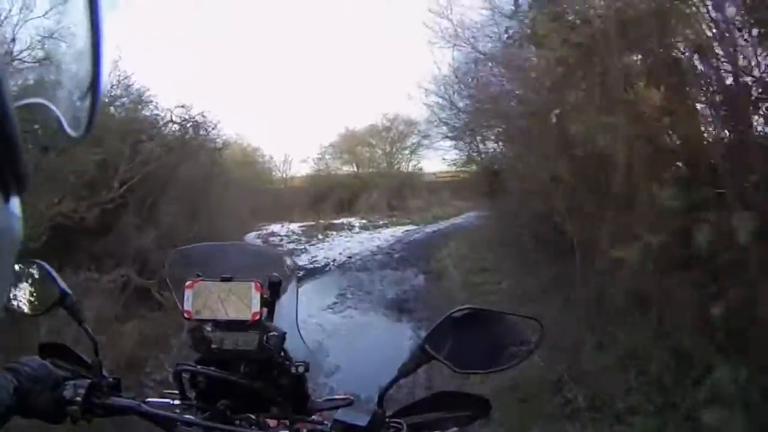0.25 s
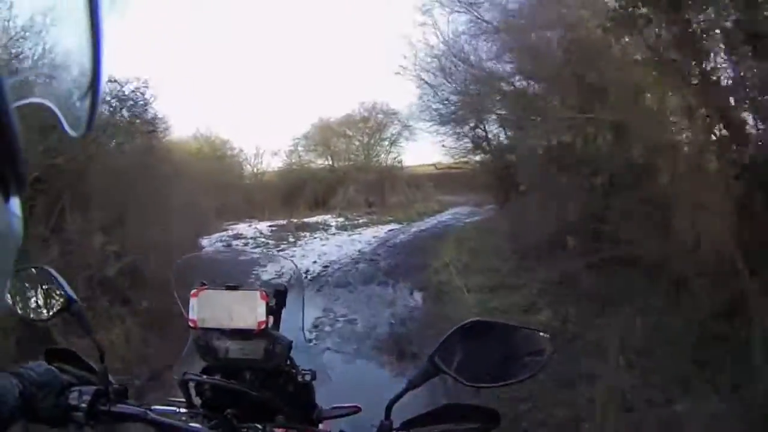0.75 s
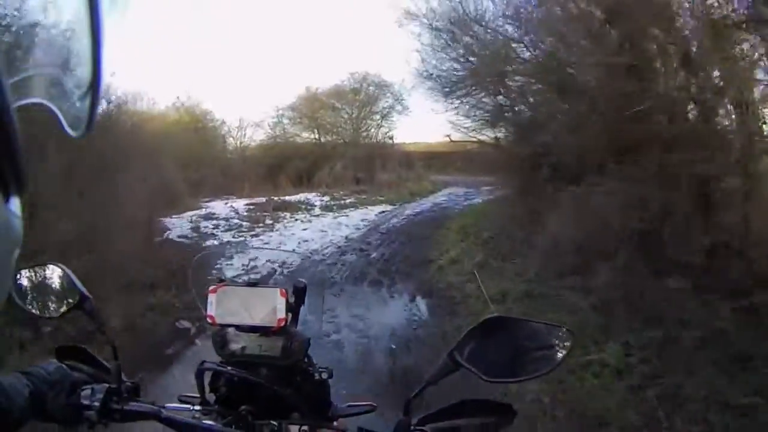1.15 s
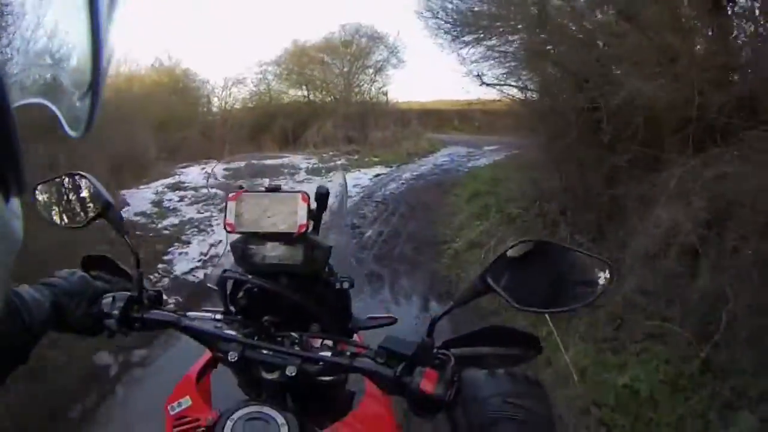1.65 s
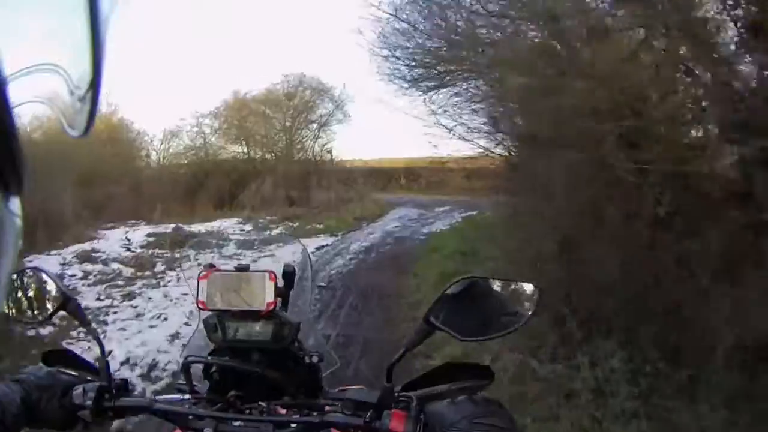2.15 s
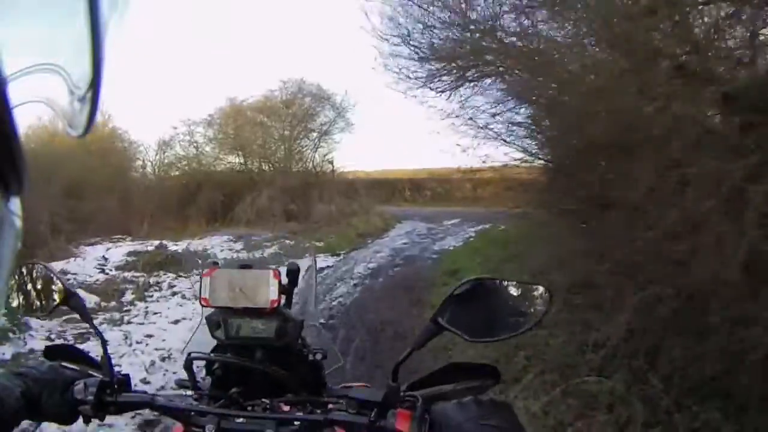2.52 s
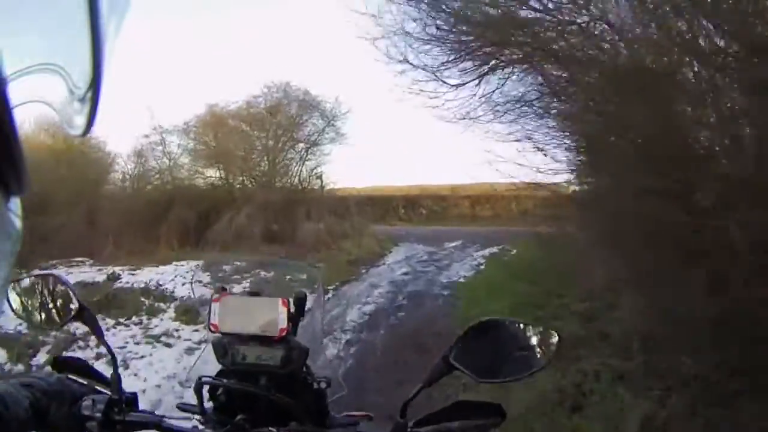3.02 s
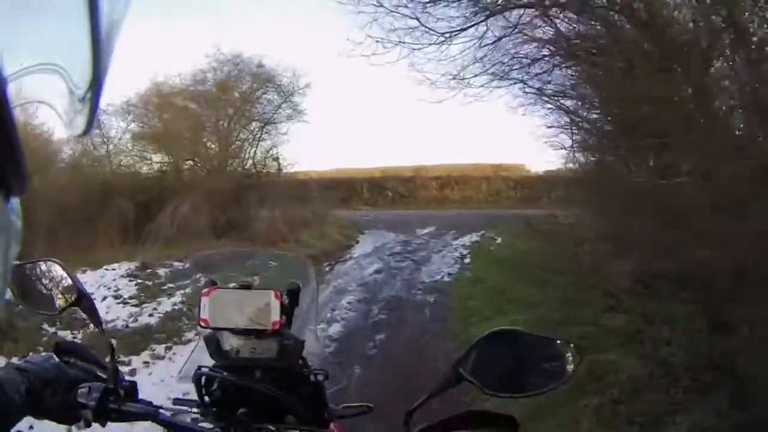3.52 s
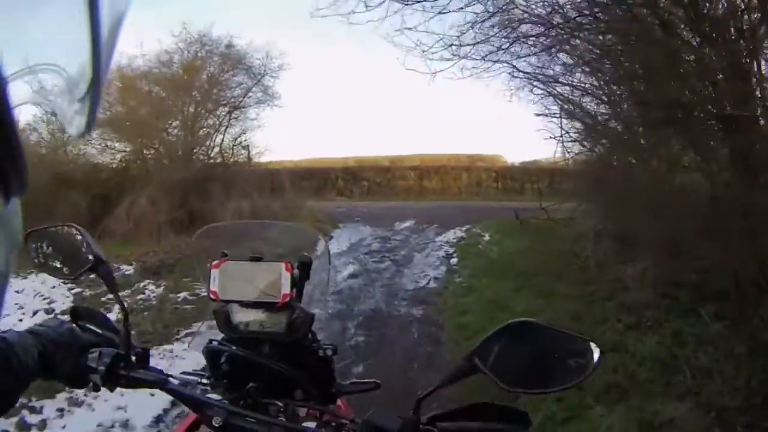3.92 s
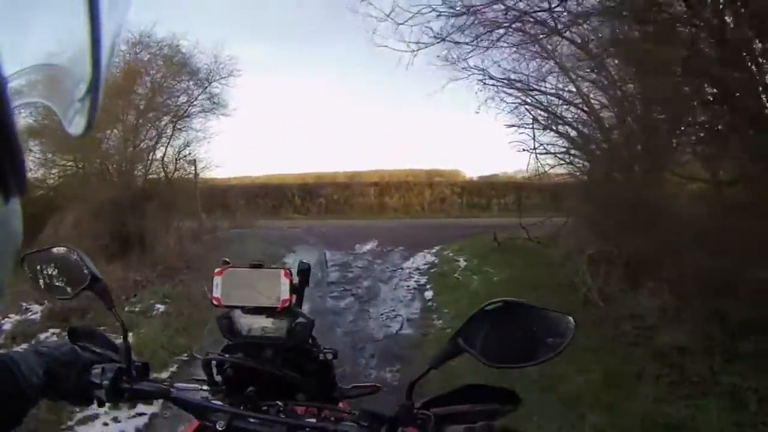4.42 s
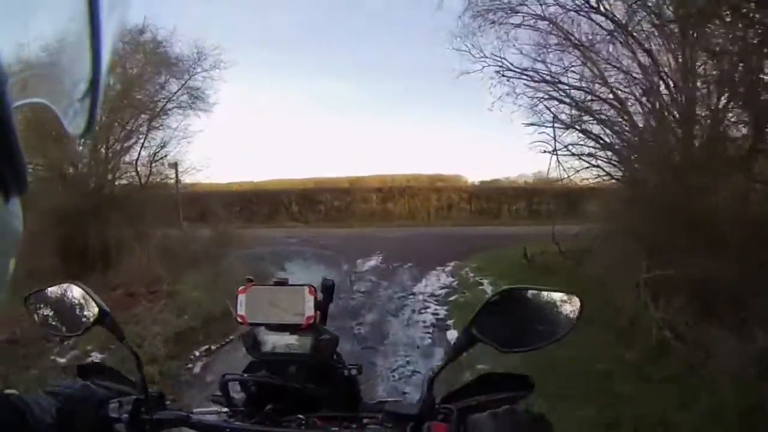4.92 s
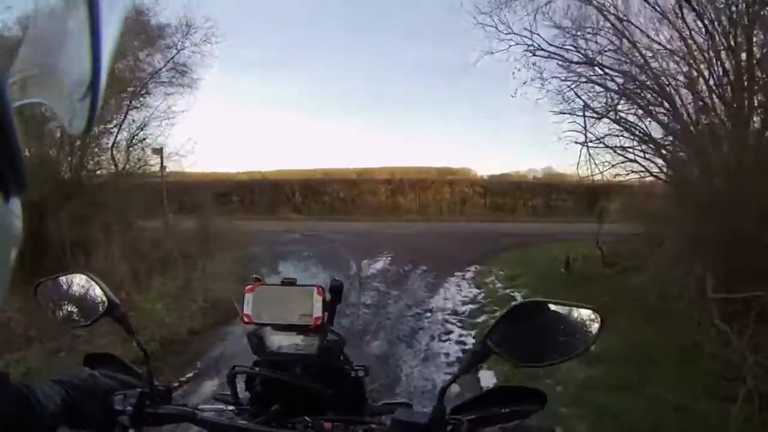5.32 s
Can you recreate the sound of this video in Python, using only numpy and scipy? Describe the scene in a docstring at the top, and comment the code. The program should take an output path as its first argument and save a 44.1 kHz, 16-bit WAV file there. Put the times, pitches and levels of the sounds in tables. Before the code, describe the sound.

Helmet-mounted view of a small motorbike easing off, pulling forward twice and slowing, amid wet spray, low gust thumps and mount rattles.

```python
"""Trail motorcycle on a slushy track

A single-cylinder engine opens up and shuts down, heard from a microphone in a camera on the rider's helmet.
Each firing excites exhaust resonances and each gulp of air the airbox; sine tones make throb, drone and gears.
Shaped noise makes valve sizzle, tyre spray and wind; gust blows are drawn as pairs of opposite swings.
Knocks ring the mount and bumps swell a helmet hum, over faint circuit tones and a steady rush.
The camera housing then colours the treble."""
import sys
import numpy as np
from scipy import signal
from scipy.fft import rfft, irfft
from scipy.io import wavfile
from scipy.ndimage import uniform_filter1d

SR = 44100
rng = np.random.default_rng(int(sys.argv[2]) if len(sys.argv) > 2 else 0)


def materialize(psi):
    """Save the field psi as 16-bit PCM at rate SR to the path in sys.argv[1].

    A 1-D psi becomes a single channel; in a 2-D psi each row is a channel.
    """
    bounded = np.clip(np.atleast_2d(psi).T, -1, 1)
    quanta = np.round(bounded * 32767).astype(np.int16)
    wavfile.write(sys.argv[1], SR, quanta)


N = 245195  # length in samples


def undb(db):
    """Decibels to gain."""
    return 10 ** (np.asarray(db) / 20)


def unit(x):
    """Scale to rms 1."""
    return x / np.sqrt(np.mean(x ** 2))


def noise():
    """Flat random noise, one value per sample."""
    return rng.standard_normal(N)


def curves(table):
    """Columns of a time table, one value per sample."""
    s, *columns = np.transpose(table)
    return [np.interp(np.arange(N) / SR, s, column) for column in columns]


def band(x, hz, width):
    """Two-pole resonance, gain 1 at the centre."""
    return signal.lfilter(*signal.iirpeak(hz, hz / width, SR), x)


def colour(x, shape):
    """Give a flat sound a spectrum of (Hz, relative dB) points, at rms 1."""
    hz, db = np.transpose(shape)
    f = np.arange(N // 2 + 1) * SR / N + 1  # the extra 1 Hz avoids log(0)
    gain = undb(np.interp(np.log(f), np.log(hz), db, left=-80))
    return unit(irfft(rfft(x) * gain, N))


def walk(rate):
    """Random levels held 1 / rate s, then smoothed twice; rms 1."""
    k = int(SR / rate)
    steps = np.repeat(rng.standard_normal(N // k + 1), k)
    return unit(uniform_filter1d(uniform_filter1d(steps, k), k)[:N])


def grains(rate, spread_db):
    """Lone clicks at random moments (rate per second), a few much larger than the rest."""
    return (rng.random(N) < rate / SR) * noise() * undb(spread_db * rng.exponential(size=N))


def add(out, s, x):
    """Mix x into out from time s."""
    i = max(int(s * SR), 0)
    out[i:i + len(x)] += x[:N - i]


def ring(modes):
    """Struck modes: a sum of sines, each dying away exponentially."""
    t = np.arange(SR // 8) / SR
    return sum(undb(db) * np.sin(2 * np.pi * hz * t) * undb(-60 * t / t60) for hz, db, t60 in modes)


# Thin electronic tones. Each row: pitch in Hz, width in Hz, level in dB.
CIRCUIT_TONES = [(3850, 150, -71), (6530, 30, -74), (9543, 14, -77), (12724, 12, -86)]
# Spectrum of the steady rush. Each row: frequency in Hz, relative level in dB per Hz.
RUSH_SHAPE = [(410, -5), (700, -4), (981, -2.5), (1260, -3), (2350, -3.5), (2600, -0.5), (3870, -15),
              (4500, -11), (6300, -6.5), (8500, -9), (9280, -3.5), (11300, -23), (13800, -10)]
RUSH_DB = -61


def circuit():
    """Faint wavering tones, made of narrow-band noise, over a steady rush that never stops."""
    tones = sum(undb(db) * unit(band(noise(), hz, width)) for hz, width, db in CIRCUIT_TONES)
    return tones + undb(RUSH_DB + 0.56 * walk(7.2)) * colour(noise(), RUSH_SHAPE)


# Level of the deep wind. Each row: time in seconds, level in dB.
DEEP_WIND = [(0, -40.5), (.5, -51), (.7, -46), (1.3, -41.5), (1.55, -53), (1.9, -43), (2.6, -50),
             (2.8, -33), (3.0, -44.5), (3.35, -43), (3.7, -44.5), (4.0, -40), (4.3, -38), (4.6, -47),
             (5.2, -44.5), (5.56, -47)]
# Spectrum of the flutter. Each row: frequency in Hz, relative level in dB per Hz.
FLUTTER_SHAPE = [(30, -8), (50, -8), (75, -8), (120, -12), (200, -17), (270, -15), (340, -21), (470, -21),
                 (560, -28), (800, -33), (1500, -42)]
FLUTTER_DB, FLUTTER_THROTTLE_DB = -55.5, 3  # throttle shut, rise at full throttle


def wind():
    """Slow pressure swings on the microphone port, with ragged flutter from eddies above them."""
    deep_shape = [(4, -22), (12, -4), (30, -9.5), (42, -15.5), (60, -13), (90, -51), (300, -106)]  # Hz, dB
    deep = colour(noise(), deep_shape)
    eddies = undb(2.2 * walk(30)) * noise() + .5 * unit(grains(200, spread_db=1.0))
    # eddies grow as the bike pulls forward
    flutter_db = FLUTTER_DB + FLUTTER_THROTTLE_DB * curves(THROTTLE)[0] + 0.98 * walk(8)
    deep_db = curves(DEEP_WIND)[0] + 2.0 * walk(9)
    return undb(deep_db) * deep + undb(flutter_db) * colour(eddies, FLUTTER_SHAPE)


# Pressure blows of gusts on the port. Each row: time of the first swing's peak in seconds, peak in dB,
# length scale in ms, direction of the first swing (+1 or -1), return swing as a share of the first.
GUST_BLOWS = [(0.619, -40, 19, 1, .6), (.83, -33.5, 40, 1, 0.3), (1.486, -18, 13.4, -1, 0.23),
              (1.789, -34, 15.3, -1, 1), (2.726, -36, 13, -1, 0.87), (3.08, -32, 31, -1, 0.45),
              (3.21, -28.5, 25, -1, 1.2), (3.592, -28.5, 62, 1, 0.82), (3.791, -31, 66, 1, 0.59),
              (3.912, -30.5, 42, 1, 0.3), (4.012, -31.5, 27, 1, 0.15), (4.169, -36, 20, 1, 1.1),
              (5.397, -31.5, 40, 1, 0.69)]


def gusts():
    """Each gust is a sharp swing, then the diaphragm overshoots slowly the other way."""
    out = np.zeros(N)
    u = np.linspace(-3, 6, 900)  # 1.5 units last one length scale
    swing = np.exp(-np.abs(u / 0.32) ** 1.41)
    back = np.exp(-((u - 1.1) / 0.35) ** 2)
    for s, db, ms, sign, share in GUST_BLOWS:
        at = np.arange(-3, 6, 1500 / (ms * SR))
        blow = np.interp(at, u, swing - share * back)
        add(out, s - 3 * ms / 1500, np.sign(sign) * undb(db) * blow)
    return out


# Knocks of the camera mount. Each row: start in seconds, strike level in dB, brightness in dB.
KNOCKS = [(.622, -43, -23), (0.964, -39.5, -14), (1.075, -37, -28), (1.433, -35.5, -24), (1.885, -63, -7.5),
          (2.346, -42.5, -29), (3.044, -30, -38), (3.967, -43, -29), (4.064, -42, -19), (5.2049, -41.5, 3),
          (5.4317, -43.5, 1)]
# Body and click modes of the mount. Each row: pitch in Hz, level in dB, 60 dB decay time in seconds.
MOUNT_LOW = [(88, -4.5, 0.24), (166, -9.5, 0.11), (249, -7, 0.061), (360, -7, 0.097)]
MOUNT_HIGH = [(576, -14, 0.051), (1040, -12.5, 0.033), (1193, -5, 0.027), (1396, -14, 0.016),
              (1800, -21, 0.02), (3800, -8, 0.014)]
RATTLE_S = 0.014  # the low modes ring freely this long before the loose part seats again


def mount():
    """Each jolt rings the mount; brighter ones are plastic parts clicking together."""
    out = np.zeros(N)
    high = ring(MOUNT_HIGH)
    seated = np.clip(np.arange(len(high)) / SR - RATTLE_S, 0, 1)
    damped = ring(MOUNT_LOW) * undb(-2500 * seated)  # loses a further 2500 dB per second once seated
    # a padded contact: the push is spread over about a millisecond
    low = np.convolve(damped, np.hanning(60) / 30)[:len(high)]
    for s, db, bright_db in KNOCKS:
        bright = undb(bright_db)
        body = np.sqrt(1 - min(bright, .95) ** 2)
        add(out, s, -undb(db) * (body * low + bright * high))
    return out


# Bumps that set the helmet swaying. Each row: time of the peak in seconds, peak of the added swell in dB.
BUMPS = [(.6, -51.5), (1.0, -41.5), (1.5, -43), (2.88, -44), (3.55, -50), (5.15, -51)]
SWAY_HZ, SWAY_WIDTH = 47.3, 1.67  # pitch and width in Hz
SWAY_DB, SWAY_RISE_S, SWAY_FALL_S = -57, 0.033, 0.14  # constant hum, then swell times to 1/e


def helmet():
    """The helmet hums at its own pitch, as narrow-band noise swelling at each bump and dying away."""
    t = np.arange(N) / SR
    swell = np.zeros(N)
    for s, db in BUMPS:
        span = np.where(t < s, SWAY_RISE_S, SWAY_FALL_S)
        swell += undb(db) * np.exp(-((t - s) / span) ** 2)
    return (undb(SWAY_DB) + swell) * unit(band(noise(), SWAY_HZ, SWAY_WIDTH))


# Spectrum of the spray. Each row: frequency in Hz, relative level in dB per Hz.
SPRAY_SHAPE = [(410, -8), (700, -12.5), (945, -20.5), (1360, -7.5), (1700, -17.5), (1950, -12.5),
               (2380, -20), (3550, -6), (4390, -8), (6460, 1.5), (7510, -5.5), (9880, -5), (13800, -23)]
# Continuous spray from the tyres. Each row: time in seconds, level in dB.
WET_TRACK = [(0, -56.5), (.5, -59.5), (.8, -56.5), (1.3, -51.5), (1.75, -54), (2.05, -51), (2.35, -53.5),
             (2.75, -56), (3.1, -62), (3.7, -65), (4.0, -60), (4.5, -66), (5.1, -59.5), (5.56, -61.5)]
# The wheels plough through deeper slush. Each row: time of the peak in seconds, peak in dB, length in seconds.
SPLASHES = [(.61, -57, 0.053), (0.954, -63, 0.068), (1.212, -57, 0.028), (1.392, -60, 0.055),
            (1.573, -56.5, 0.17), (1.893, -54.5, 0.062), (2.716, -60, 0.032), (3.004, -65, 0.13)]
# Slaps of slush on the mudguard. Each row: start in seconds, peak in dB, 60 dB decay time in seconds.
SLAPS = [(0.844, -51, 0.081), (0.867, -50, 0.04), (0.97, -49, 0.06), (1.035, -52, 0.08),
         (1.074, -50, 0.026), (1.2062, -60, 0.07), (1.5714, -43.5, 0.039), (3.2212, -55, 0.044),
         (3.5628, -58, 0.072), (3.8526, -53, 0.058), (4.9896, -53, 0.06)]


def tyre_spray():
    """Fine drops, as noise and grains, swell in splashes and burst in slaps."""
    drops = noise() + .4 * unit(grains(3000, spread_db=2.0))
    t = np.arange(N) / SR
    burst = sum(undb(db) * np.exp(-(2 * (t - s) / length) ** 2) for s, db, length in SPLASHES)
    for s, db, t60 in SLAPS:
        add(burst, s, undb(db - 60 * t[:SR // 8] / t60))
    steady = undb(curves(WET_TRACK)[0] + 1.1 * walk(24.9))
    return (steady + burst) * colour(drops, SPRAY_SHAPE)


# Spectrum of the valve gear. Each row: frequency in Hz, relative level in dB per Hz.
SIZZLE_SHAPE = [(410, -17), (700, -9.5), (793, -28), (1310, -22), (1520, -10), (1700, -22), (1970, -6.5),
                (2350, -22.5), (3590, -3.5), (5160, -6), (5560, -1), (6380, 4.5), (7600, -10), (9640, -6.5),
                (13800, -35)]


def valve_gear(puff, sizzle_db):
    """Sizzling noise that pulses a little with the engine cycle."""
    sizzle = colour((1 + 0.2 * puff) * noise(), SIZZLE_SHAPE)
    return undb(sizzle_db + 0.61 * walk(12)) * sizzle


# Main gear tones. Each row: tooth contacts per crank turn, relative level in dB.
GEAR_TONES = [(26, 2), (34.7, 4)]
# Covers that radiate the gears. Each row: pitch in Hz, nominal width in Hz, gain in dB.
CASING = [(1350, 210, -4.5), (1480, 153, 1.5), (1917, 130, 1.5), (3576, 118, 4.5), (3784, 260, 5)]
CHATTER_ORDER = 69.8  # contacts per crank turn of the fastest gear
SLACK_THROTTLE = .3  # below this the teeth run increasingly unloaded and chatter less
SURGE = .045  # share by which the crank speeds up and slows within a cycle


def gears(cycles, hz, throttle, size, puff, whine_db, chatter_db):
    """Meshing teeth whine and chatter with the firing load, heard through the resonant covers."""
    surge = 2 * SURGE * np.cos(2 * np.pi * cycles)
    wobble = np.cumsum(0.00304 * walk(60) * hz) / SR
    shaft = 4 * np.pi * (cycles + wobble)
    tones = sum(undb(db) * np.sin(teeth * (shaft + 0.26 * surge)) for teeth, db in GEAR_TONES)
    whine = (0.55 + .5 * puff) * tones  # loaded hardest just after each firing
    # teeth slam half a cycle after each firing, more weakly at the firing itself, and never cleanly
    slam = np.sin(np.pi * cycles) ** 14 + .35 * np.cos(np.pi * cycles) ** 14
    load = size * slam * undb(2 * walk(700))
    chatter = unit(load * np.sin(CHATTER_ORDER * (shaft + surge)))
    contact = np.clip(throttle / SLACK_THROTTLE, 0, 1)
    teeth = undb(whine_db) * whine + undb(chatter_db) * contact * chatter
    # two passes, each 1.24 times the nominal width
    return sum(undb(db) * band(band(teeth, f, 1.24 * w), f, 1.24 * w) for f, w, db in CASING)


# Intake drone. Each row: multiple of the firing rate, relative level in dB.
DRONE = [(4, -2), (5, 0), (6, -1), (7, 1), (9, -9), (10, -6), (11, -3), (12, -8), (13, -11)]
AIRBOX_HZ, AIRBOX_WIDTH = 274, 45  # pitch and first-pass width in Hz


def intake(cycles, drone_db, airbox_db):
    """A drone of firing-rate harmonics, and gulps of air that ring the airbox."""
    late = cycles + .5  # one crank turn after the firing
    drone = unit(sum(undb(db) * np.sin(2 * np.pi * k * late) for k, db in DRONE))
    gulps = np.diff(np.floor(late), prepend=0)
    rung = band(gulps, AIRBOX_HZ, AIRBOX_WIDTH)
    airbox = unit(band(rung, AIRBOX_HZ, 2 * AIRBOX_WIDTH))
    return undb(drone_db) * drone + undb(airbox_db) * airbox


# Exhaust resonances. Each row: pitch in Hz, width in Hz, relative level in dB.
EXHAUST_MODES = [(28.7, 8.9, 12.5), (114, 270, -24), (176, 32, 6), (282.5, 30, -5), (470, 41, 3.5)]


def exhaust(firings):
    """Each firing thuds through the exhaust resonances, which alternate in polarity."""
    out = np.zeros(N)
    for k, (hz, width, db) in enumerate(EXHAUST_MODES):
        # wide resonances are turned down
        out += (-1) ** k * undb(db) * np.sqrt(100 / width) * band(firings, hz, width)
    return unit(out)


def crank_throb(cycles):
    """The unbalanced piston shakes the frame once a turn, a nearly pure tone."""
    return np.sqrt(2) * undb(0.15 * walk(19)) * np.sin(4 * np.pi * cycles)


# Engine speed. Each row: time in seconds, firing rate in Hz.
REVS = [(0, 26), (.46, 24.2), (.73, 20.5), (1.04, 18), (1.52, 18), (1.75, 20.2), (1.86, 22.5), (2.0, 27.5),
        (2.1, 30), (2.22, 30.3), (2.38, 29), (2.51, 27.8), (2.74, 24.8), (2.91, 21.5), (3.05, 19.3),
        (3.5, 18.05), (3.95, 20), (4.1, 23.5), (4.2, 25.7), (4.43, 28.4), (4.58, 29.1), (4.75, 29),
        (4.92, 27.9), (5.03, 26.5), (5.16, 22.9), (5.31, 18.3), (5.56, 17.2)]
# Throttle opening. Each row: time in seconds, opening from 0 to 1.
THROTTLE = [(0, .4), (.5, .3), (.7, .1), (1.5, .15), (1.75, .7), (1.93, .95), (2.12, .5), (2.75, .45),
            (3.0, .05), (3.75, .15), (4.05, .9), (4.35, .9), (4.6, .5), (4.85, .04), (5.56, 0)]
# Part levels with the throttle shut; the frame and covers resonate near the middle.
# Each row: firing rate in Hz, then crank throb, gear whine, chatter, valve sizzle and intake drone, each in dB.
BY_SPEED = [(17, -51, -80, -89, -63.5, -63), (21.26, -89, -75.5, -76, -55.5, -83),
            (23.5, -44.5, -72, -59, -53, -77), (25.4, -41, -67, -64, -52.5, -75),
            (27.2, -43, -68, -64, -51.5, -64.5), (28.8, -44.5, -70, -81, -50, -60),
            (29.7, -49, -73, -86, -50.5, -60.5)]
# Gain at full throttle, one row: throb, whine, chatter, sizzle, drone, exhaust and airbox, each in dB.
THROTTLE_GAIN = (1.2, 1.1, 4.3, 0.54, 4.8, 1.3, 24.3)
EXHAUST_DB, AIRBOX_DB = -65.5, -78.5  # throttle shut
THROB_LAG_S = 0.07  # the frame takes this long to follow the engine speed


def engine():
    """One firing every second crank turn drives the throb, exhaust, intake, gears and valve gear."""
    (hz,), (throttle,) = curves(REVS), curves(THROTTLE)
    speeds, *levels = np.transpose(BY_SPEED)
    shut_db = [np.interp(hz, speeds, db) for db in levels] + [EXHAUST_DB, AIRBOX_DB]
    n = np.arange(N)
    shut_db[0] = np.interp(n - THROB_LAG_S * SR, n, shut_db[0])
    part_db = [db + up_db * throttle for db, up_db in zip(shut_db, THROTTLE_GAIN)]
    throb_db, whine_db, chatter_db, sizzle_db, drone_db, exhaust_db, airbox_db = part_db

    cycles = np.cumsum(hz) / SR + .12
    whole = np.floor(cycles).astype(int)
    size = undb(0.45 * rng.standard_normal(N // 500))[whole]  # every firing differs slightly
    firings = size * np.diff(whole, prepend=0)
    puff = unit(np.exp(-(cycles - whole) / 0.27))  # jumps at each firing, then decays

    motor = undb(throb_db) * crank_throb(cycles) + undb(exhaust_db) * exhaust(firings)
    motor += intake(cycles, drone_db, airbox_db)
    motor += gears(cycles, hz, throttle, size, puff, whine_db, chatter_db)
    return motor + valve_gear(puff, sizzle_db)


def scene():
    """All sources at the single microphone."""
    surroundings = circuit() + wind() + gusts() + mount() + helmet()
    return (surroundings + tyre_spray() + engine())[None]


# Cavities before the microphone. Each row: pitch in Hz, width in Hz, boost in dB (negative cuts).
HOUSING = [(2310, 410, -3.5), (5610, 66, 5), (6640, 170, 4), (7180, 1250, -2.5), (12140, 590, 6.5)]
OFFSET = -.0152  # constant added ahead of the top cut, full scale = 1
TOP_HZ = 13990  # upper edge of the passband


def record(dry):
    """The housing colours the treble, the converter sits slightly below zero and the top is cut."""
    for hz, width, db in HOUSING:
        dry = dry + (undb(db) - 1) * band(dry, hz, width)
    top_cut = signal.ellip(12, .2, 75, TOP_HZ, fs=SR, output="sos")
    return signal.sosfilt(top_cut, dry + OFFSET)


dry = scene()
out = record(dry)
materialize(out)
```